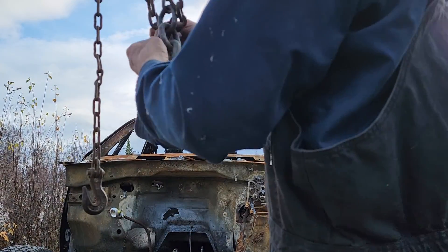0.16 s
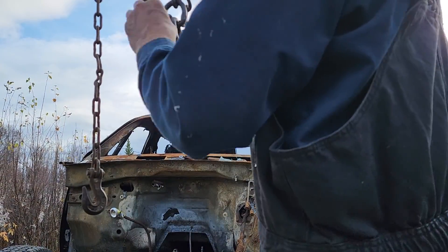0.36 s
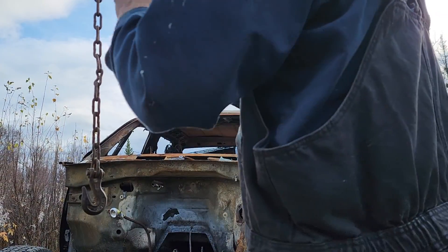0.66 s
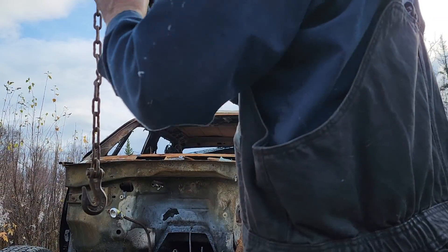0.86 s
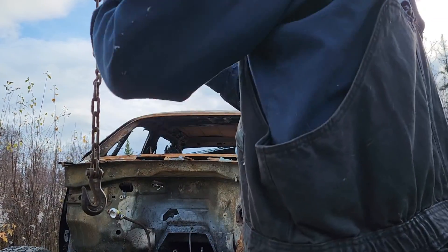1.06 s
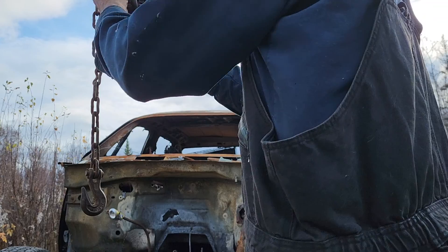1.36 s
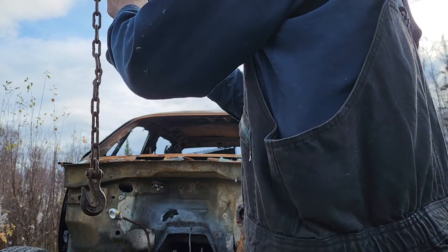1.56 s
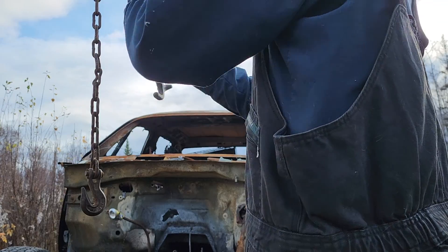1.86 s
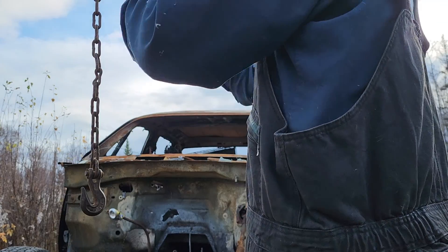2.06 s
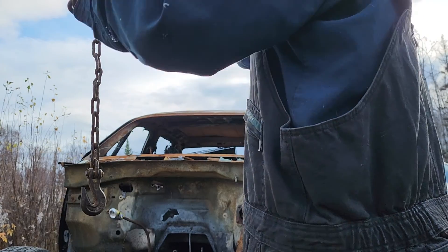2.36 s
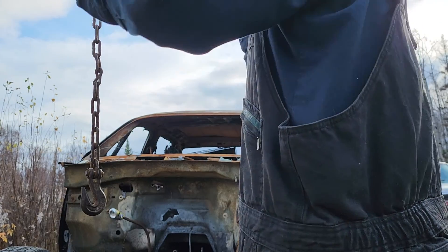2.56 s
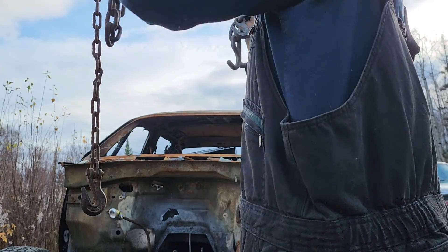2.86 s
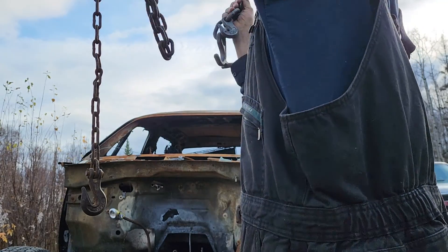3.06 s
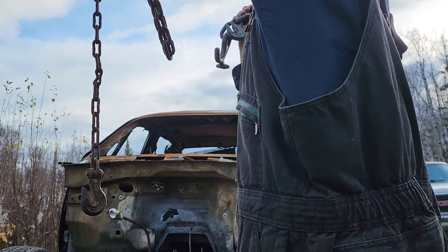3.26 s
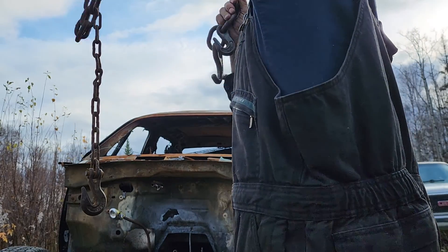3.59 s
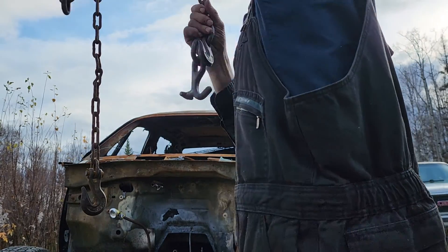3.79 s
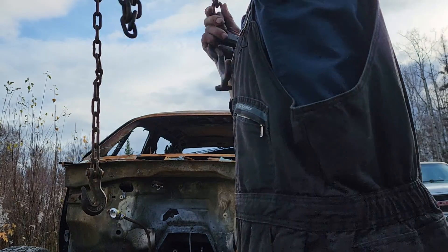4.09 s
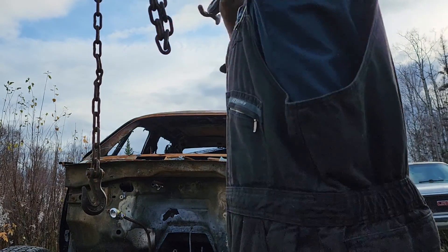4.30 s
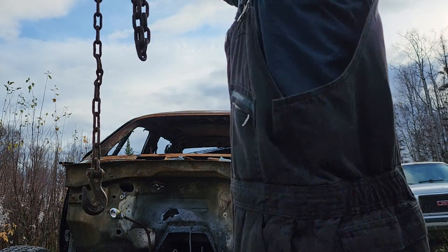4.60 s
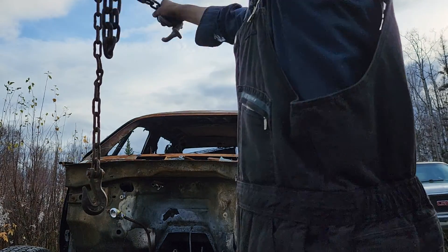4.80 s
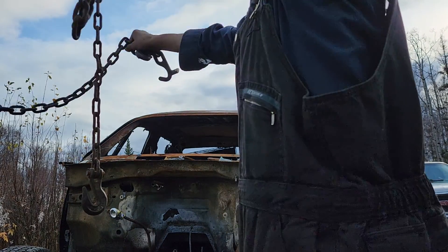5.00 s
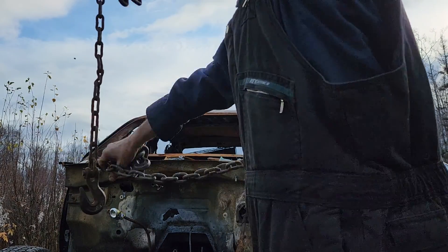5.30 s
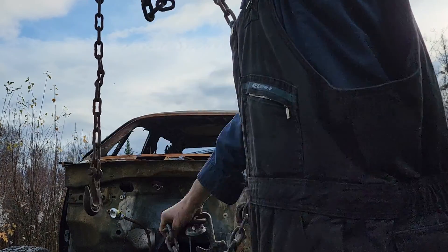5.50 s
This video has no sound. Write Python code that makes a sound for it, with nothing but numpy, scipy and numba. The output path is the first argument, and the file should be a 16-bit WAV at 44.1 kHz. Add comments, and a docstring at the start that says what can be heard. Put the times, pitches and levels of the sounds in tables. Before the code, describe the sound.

Steel chain and hook clink and ring brightly close by while a rough truck engine idles steadily a few metres behind, outdoors.

```python
"""A V8 truck idles a few metres from a phone with two microphone ports. Uneven exhaust puffs ring the pipes of
its two banks; valve blows rattle covers and block. Close to the phone, hands shift a steel chain and hook: each
clink rings decaying link and hook modes. Slack chain knocks on a car shell, ringing dull sheet-metal modes and
a scrape of noise. Behind them lies banded noise of fan rush and open air; the phone's gain control turns the
scene down twice."""
import sys
import numpy as np
from scipy import signal
from scipy.io import wavfile
from scipy.ndimage import uniform_filter1d
from numba import njit

SR = 44100
rng = np.random.default_rng(int(sys.argv[2]) if len(sys.argv) > 2 else 0)


def store_pcm(level_fs):
    """Save levels as 16-bit WAV."""
    pcm = np.round(np.clip(level_fs, -1, 1) * 32767).astype(np.int16)
    wavfile.write(sys.argv[1], SR, np.atleast_2d(pcm).T)


N = 249008


def undb(db):
    """Decibels to an amplitude factor."""
    return 10 ** (np.asarray(db) / 20)


def level(x, db):
    """Scale x to an rms level."""
    return x * undb(db) / np.sqrt(np.mean(x ** 2))


def band(x, hz, width):
    """Two-pole resonance, gain 1 at the centre."""
    return signal.lfilter(*signal.iirpeak(hz, hz / max(width, 1), fs=SR), x)


def band_twice(x, hz, width, second_width):
    """Two resonances in a row at one centre, for steeper skirts."""
    return band(band(x, hz, width), hz, second_width)


def butter(x, order, hz, kind="low"):
    """Butterworth filter."""
    return signal.sosfilt(signal.butter(order, hz, kind, fs=SR, output="sos"), x)


def pair(likeness):
    """Left and right noise that share a part."""
    mid, side = rng.standard_normal((2, N))
    c = np.clip(likeness, 0, 1)
    return np.sqrt((1 + c) / 2) * mid + np.sqrt((1 - c) / 2) * side * np.array([[1], [-1]])


def spikes(s, size):
    """An impulse at each time that falls within the scene."""
    at = (np.asarray(s) * SR).astype(int)
    keep = (at >= 0) & (at < N)
    return np.bincount(at[keep], size[keep], N)


def fade(x, t60):
    """Each impulse becomes an exponential tail."""
    return signal.lfilter([1], [1, -np.exp(-np.log(1000) / (t60 * SR))], x)


# Idle speed: t/s, engine cycles f/Hz; one cycle is two crank turns, eight firings
IDLE_SPEED = [(0.0, 5.8499), (1.1, 5.874), (2.2, 5.8646), (3.3, 5.862), (4.4, 5.8513), (5.65, 5.8838)]
FIRST_FIRING = .188  # cycles


def times(count):
    """Moments at which the engine passes each of count equal steps of its cycle."""
    s, cycle_hz = np.transpose(IDLE_SPEED)
    clock = np.arange(N) / SR
    turns = np.cumsum(np.interp(clock, s, cycle_hz)) / SR - FIRST_FIRING
    step = np.arange(-count, int(turns[-1] * count) + 1)
    return np.interp(step / count, turns, clock, left=-1), step % count


# Cylinders in firing order: exhaust bank, lateness t/ms, level/dB
FIRING_ORDER = [(0, -0.15, 4), (1, -0.36, 4.5), (1, 0.27, -1.9), (0, -0.36, 7), (1, -0.45, 4),
                (0, -0.96, 0.5), (0, -1.45, 2), (1, -0.52, 1.5)]
# Standing waves, one list for each bank's pipe: f/Hz, width f/Hz, level/dB, polarity
PIPE_MODES = [
    [(66, 35.3, 23, 1), (77.9, 5.1, 33.5, -1), (101.67, 8.85, 39.5, -1), (105.1, 7.56, 41.5, 1),
     (120, 13.6, 25, -1), (157.7, 8.5, 29.5, -1), (232.7, 17.5, 30, -1), (231.57, 14.8, 33.5, 1)],
    [(45.2, 7, 27.5, -1), (64.55, 27.4, 37, 1), (65.38, 10.9, 39.5, -1), (134.4, 26.1, 31.5, -1),
     (177, 12.7, 37, -1), (177.14, 7.74, 40, 1), (231.3, 6, 23.5, -1), (260.3, 27, 19, 1)],
]


def exhaust():
    """The banks fire unevenly (cross-plane crank), each into its own pipe."""
    s, cylinder = times(count=8)
    bank, late_ms, db = np.transpose(FIRING_ORDER)[:, cylinder]
    late_chance, size_chance = rng.standard_normal((2, len(s)))
    s = s + (late_ms + 0.19 * late_chance) / 1000
    size = undb(db + 1.38 * size_chance)  # combustion varies
    out = 0
    for k, pipe in enumerate(PIPE_MODES):
        puffs = spikes(s, size * (np.round(bank) == k))
        for hz, width, mode_db, polarity in pipe:
            out = out + np.sign(polarity) * undb(mode_db) * band(puffs, hz, width)
    out = butter(butter(out, 2, 400), 1, 20, "high")
    # low tones reach both ports alike; a band near 208 Hz differs between them
    lean = level(band(out, 208, 140), -17.0) * np.array([[-1], [1]])
    return level(out, 0) + lean


# Sixteen valve events a cycle: level/dB in the pan and covers, level/dB in the block
VALVE_BLOWS = [(-7.5, -10), (-2.5, 4.5), (-4.5, -7), (-16, -12), (0.5, -37.5), (-8.5, 2), (-10, 11.5),
               (-11, -15), (-11.5, -4), (0.5, -3.5), (-5, 8.5), (-12, 3.5), (-11.5, 2), (-3, 3.5),
               (-6.5, -6), (-12.5, -32)]
# Resonances of the pan and covers: f/Hz, width f/Hz, level/dB
COVER_MODES = [(476, 60, -2.5), (536, 42, 5.5), (752, 540, -5), (838, 180, -2), (1078, 150, 0.5)]
# Resonances of the engine block: f/Hz, width f/Hz, level/dB
BLOCK_MODES = [(1251, 76, -1.5), (1775.5, 68, 3.5), (2000, 150, -2), (2396, 73, -3.5), (2620, 120, -44),
               (3660, 150, -12.5)]
PORT_LAG_S = 0.000094  # the right port hears the valve gear later


def clatter():
    """Each valve blow is a tick and a puff of hiss; both ring the covers and the block."""
    s, valve = times(count=16)
    blow_db = np.array(VALVE_BLOWS)[valve]
    out = 0
    for k, (modes, db, likeness, tick_db) in enumerate([(COVER_MODES, -16, .4, 19), (BLOCK_MODES, -14, .5, 14)]):
        blows = spikes(s, undb(blow_db[:, k] + 1.7 * rng.standard_normal(len(s))))
        hiss = (fade(blows, 0.064) + 0.14) * pair(likeness)  # a little hiss never stops
        drive = hiss + undb(tick_db) * blows
        ringing = sum(undb(mode_db) * band_twice(drive, hz, width, 2 * width) for hz, width, mode_db in modes)
        out = out + level(ringing, db)
    out[1] = np.interp(np.arange(N) - PORT_LAG_S * SR, np.arange(N), out[1])
    # the bonnet holds the treble back; the left port hears a little more
    return butter(out, 2, 3200) * undb(np.array([[.8], [-.8]]))


@njit
def add(out, start, pole, rise, left, right):
    """Adds sines that swell and decay, each with its own size and phase at the two microphone ports."""
    for k in range(len(start)):
        z, rest, i = 1. + 0j, 1., start[k]
        while i < out.shape[1] and z.real ** 2 + z.imag ** 2 > 1e-6:
            out[0, i] += (1 - rest) * (z * left[k]).imag
            out[1, i] += (1 - rest) * (z * right[k]).imag
            z, rest, i = z * pole[k], rest * rise, i + 1


def strike(s, db, pan_db, ring, rise_ms, modes, detune, scatter_db, spread, ping_hz=None):
    """Every blow rings one table of modes; where it lands changes the share of each."""
    hz, mode_db, t60 = np.transpose(modes)
    share_chance, pitch_chance, phase_chance = rng.standard_normal((3, len(s), len(hz)))
    share_db = mode_db + scatter_db * share_chance
    hz = hz * (1 + detune * pitch_chance)
    if ping_hz is not None:  # the mode next to the ping gets a fixed, large share
        nearest = np.arange(len(s)), np.argmin(abs(hz - ping_hz[:, None]), axis=1)
        share_db[nearest] = 13.5
    size = undb(share_db)
    size = size / np.sqrt(np.sum(size ** 2, axis=1, keepdims=True)) * undb(db)[:, None]
    # a grip adds its damping to each mode's own
    decay = np.log(1000) * (1 / t60 + 1 / np.clip(ring, .01, 5)[:, None])
    pole = np.exp((2j * np.pi * hz - decay) / SR)
    rise = np.exp(-1000 / (rise_ms * SR))
    tilt = undb(pan_db / 2)[:, None] * np.exp(1j * spread * phase_chance)
    out = np.zeros((2, N))
    start = np.repeat((s * SR).astype(np.int64), len(modes))
    add(out, start, pole.ravel(), rise, (size * tilt).ravel(), (size / tilt).ravel())
    return out


REBOUND_FADE_DB, REBOUND_SCATTER_DB = 6, 2.5  # loss per mean delay; scale of the random gain


def rebounds(s, mean_s, count):
    """After each blow, count small collisions follow at random: times, gains in dB, index of the blow."""
    delay, luck = rng.exponential(size=(2, len(s), count))
    gain_db = REBOUND_SCATTER_DB * luck - REBOUND_FADE_DB * delay
    at = s[:, None] + .004 + mean_s * delay
    return at.ravel(), gain_db.ravel(), np.repeat(np.arange(len(s)), count)


# Clinks close to the phone: t/s, link stretching peak level/dB, link bending rms level/dB,
# hook rms level/dB, the hook's loudest ping f/Hz
CLINK_BLOWS = [(0.0214, -52, -43.5, -48, 3060), (0.0941, -26, -25, -36.5, 3150),
               (0.1214, -41, -45, -38, 3660), (0.1965, -31, -45, -48, 3150), (0.2318, -38, -42, -45, 4410),
               (0.343, -20, -45, -41, 3660), (0.368, -28, -45, -48, 3010),
               (0.4348, -40, -39.5, -26.5, 5140), (0.4554, -36, -59, -55, 3390),
               (0.4894, -44, -60, -50, 3670), (0.5681, -56, -47, -52, 3020),
               (0.7082, -33, -29.5, -49, 3060), (0.7341, -43, -30.5, -47, 5780),
               (0.799, -27, -30.5, -40, 3840), (0.8693, -17, -30, -32, 5200),
               (0.9012, -8, -18.5, -36, 6660), (0.9264, -14, -26, -27.5, 6210),
               (0.9691, -8.5, -31, -35, 4380), (1.018, -8.5, -24, -28.5, 5430),
               (1.1392, -19, -46, -41, 3410), (1.1526, -17, -34.5, -35.5, 5150),
               (1.2974, -15.5, -36.5, -38, 3310), (1.3383, -30, -56, -42, 3000),
               (1.3866, -24, -25, -33.5, 5990), (1.4939, -42, -41, -39, 3070),
               (1.5573, -29, -42, -40, 4260), (1.6371, -20, -22.5, -34, 3000),
               (1.6544, -29, -30, -29.5, 4970), (1.7533, -19, -21, -19.5, 5110),
               (1.7738, -4.5, -12.5, -25, 5120), (1.8394, -42, -33, -35.5, 4340),
               (1.91, -46, -35, -43, 6600), (1.9344, -58, -38, -27.5, 5110), (1.9764, -34, -43, -41, 5150),
               (2.0142, -11, -25, -26, 5950), (2.0676, -20, -17.5, -21, 5450),
               (2.0851, -17, -20.5, -18.5, 6640), (2.116, -8, -30, -31, 4340),
               (2.1489, -20, -27, -16.5, 4970), (2.1709, -6, -25, -22.5, 4970),
               (2.1874, -12, -17, -21.5, 6620), (2.2019, -6.5, -24, -22, 6640),
               (2.2364, -4, -21, -22.5, 6610), (2.35, -13, -53, -43, 6620), (2.5078, -34, -56, -40, 6600),
               (2.5256, -16.5, -27.5, -27.5, 4860), (2.6363, -42, -39, -39.5, 3190),
               (2.6812, -58, -38.5, -41.5, 5000), (2.7934, -42, -56, -65, 3470),
               (2.9715, -25.5, -66, -52, 4590), (3.3751, -32, -51, -50, 3240),
               (3.5128, -23.5, -54, -45, 3540), (3.6182, -41, -56, -60, 3020),
               (3.706, -45, -52, -39.5, 6640), (3.7897, -51, -39, -35, 6660), (3.853, -56, -47, -37, 4310),
               (3.869, -59, -55, -30, 4310), (3.9055, -52, -36, -31.5, 4310), (3.935, -50, -42, -42, 6620),
               (3.9967, -52, -39, -38, 3180), (4.0102, -51, -34, -31, 5000), (4.0471, -46, -41, -41, 3180),
               (4.071, -15, -51, -38, 3170), (4.1244, -42, -33.5, -33.5, 5010),
               (4.1524, -45, -31, -48, 3580), (4.331, -25, -51, -49, 3180), (4.3509, -12, -40, -37, 4690),
               (4.3774, -10, -44, -39, 5720), (4.3979, -14, -44, -43, 3510),
               (4.4113, -10.5, -39, -34, 4150), (4.4746, -21.5, -52, -49, 3590),
               (4.4944, -24, -47, -55, 3000), (4.5295, -22, -39.5, -40, 3130),
               (4.6472, -45, -41, -38, 3160), (4.6712, -20, -34, -33, 4150),
               (4.6921, -10.5, -23, -22.5, 4450), (4.7074, -22, -21.5, -25, 4100),
               (4.767, -37, -41, -25, 4100), (4.8089, -39, -35, -18.5, 4110), (4.8473, -33, -49, -34, 4110),
               (4.9276, -15, -33, -28, 4160), (4.9399, -13, -43, -37, 4150), (4.972, -28, -35, -33, 4010),
               (5.0349, -14.5, -25, -21, 4620), (5.0882, -8.5, -31, -28, 4040),
               (5.1396, -16, -40, -43, 3220), (5.1586, -8.5, -35, -43, 3330),
               (5.2479, -23, -42.5, -36, 3500), (5.3052, -22, -46, -36, 3090),
               (5.3257, -3.5, -29.5, -30, 5100), (5.3681, -19.5, -44, -45, 5000),
               (5.4074, -36, -50, -38.5, 4980), (5.6325, -20, -52, -47, 3430)]
# Ring modes, each table: f/Hz, level/dB, t60 t/s
# lower modes of the hook
HOOK_LOW_MODES = [(3149, -8, .2), (3620, -12, .06), (4120, -6, .25), (4325, 0, .25), (4640, -10, .07),
                  (4976, -2, .2), (5130, -4, .1), (5430, -5, .07), (5900, -4, .08), (6600, -8, 1.0),
                  (6611, -10, .9)]
# links bending
BEND_MODES = [(7800, -32, .12), (8120, 4, 0.48), (8040, 3.5, 0.056), (8500, 11, 0.092), (8800, 9.5, 0.3),
              (8800, 7, 0.036)]
# upper modes of the hook
HOOK_HIGH_MODES = [(10617, 0, .35), (10812, -16, .6), (11780, -7, .2), (12149, -7, .6)]
# links stretching
STRETCH_MODES = [(14062, -11, .25), (14310, -9, .2), (14420, 0, .08), (14504, 1, .45), (14671, -7, .07),
                 (14846, -9, .08), (14900, -3, .07), (14950, -2, .3), (15200, -10, .05), (15400, -11, .05),
                 (15714, -9, .25)]
# How freely the hook hangs: t/s, ring t60 t/s of the grip's damping, before weak parts are shortened
HOOK_GRIP = [(0, 0.071), (.85, 0.16), (1.6, .12), (1.66, 0.57), (2.05, 0.18), (2.17, 2.7), (2.7, 0.99),
             (3.6, 0.17), (4.2, .2), (4.3, 0.073), (4.65, 0.1), (5.35, 0.12), (5.41, .4)]
HOOK_HIGH_DB = (-15.5, -3.5)  # upper hook modes against the lower ones: held in the hand, hanging free
LINK_PAN_DB, HOOK_PAN_DB, PAN_SCATTER_DB = 4.5, 1.5, 2  # left minus right: the links hang further left
STRETCH_GRIP_S, BEND_GRIP_S = 0.2, 0.073  # t60 of the grip's damping, before weak parts are shortened
REBOUND_DB, REBOUND_S = -13.5, .035  # loose links settling: level against the clink, mean delay
TICK_DB, TICK_T60_S = -13.5, 0.012  # click of contact before its filter, against the loudest part


def chain():
    """Each clink: a short crack with link and hook modes, then loose links settling; a grip shortens the ring."""
    s, stretch_db, bend_db, hook_db, ping_hz = np.transpose(CLINK_BLOWS)
    at, gain_db, parent = rebounds(s, REBOUND_S, count=6)
    lean_db = PAN_SCATTER_DB * rng.standard_normal(len(s))
    crest_db = 10 * np.log10(2)  # rms to peak of a sine
    loudest_db = np.max([stretch_db, bend_db, hook_db], axis=0)
    hanging = np.interp(s, *np.transpose(HOOK_GRIP))
    high_db = hook_db + np.interp(np.log10(hanging), [-1, 0], HOOK_HIGH_DB)
    each, scatter_db = np.ones(len(s)), 4
    # modes, dB, pan dB, grip t60 s, detune (links differ a little in size), ping Hz, crack dB, crack width
    parts = [
        (HOOK_LOW_MODES, hook_db + crest_db, HOOK_PAN_DB, hanging, .001, ping_hz, 1.5, 0.28),
        (BEND_MODES, bend_db + crest_db, LINK_PAN_DB, BEND_GRIP_S * each, .015, None, 3.5, 0.12),
        (HOOK_HIGH_MODES, high_db + crest_db, HOOK_PAN_DB, hanging, .0005, None, -10, 0.42),
        (STRETCH_MODES, stretch_db, LINK_PAN_DB, STRETCH_GRIP_S * each, .002, None, -3, 0.11)]
    out = 0
    for modes, db, pan_db, ring, detune, ping, crack_db, width in parts:
        # a part that hardly sounds is held in the hand and dies fast
        free = np.clip((db - loudest_db + 31.5) / 22, .2, 1.1)
        blow_pan_db = pan_db + lean_db
        out = out + strike(s, db, blow_pan_db, ring * free, 0.85, modes, detune, scatter_db, 1.29, ping)
        loose_db = db[parent] + REBOUND_DB + gain_db
        loose_pan_db = np.full(len(at), pan_db)
        out = out + strike(at, loose_db, loose_pan_db, 0.61 * ring[parent], 0.62, modes, detune,
                           1.46 * scatter_db, 1.47)
        hz = np.mean(np.transpose(modes)[0])
        # faces grinding: a narrow hiss among the modes
        grind = fade(spikes(at, undb(loose_db - 11)), .04) * pair(.1)
        out = out + band_twice(grind, hz, .09 * hz, .09 * hz)
        burst = np.array([fade(spikes(s, undb(db + side * blow_pan_db / 2)), 0.086) for side in (1, -1)])
        burst = uniform_filter1d(burst, size=132, origin=65)  # the contact rolls on over 3 ms
        out = out + undb(crack_db) * band_twice(burst * pair(0.033), hz, width * hz, 2 * width * hz)
    tick = fade(spikes(s, undb(loudest_db + TICK_DB)), TICK_T60_S) * pair(0.27)
    return out + band_twice(tick, 8000, 9000, 9000)


# Chain falling on sheet metal: t/s, peak level/dB before the 6 dB trim of the modes,
# left minus right level/dB, loudest mode f/Hz
SHELL_FALLS = [(2.533, -17, 6, 2220), (4.674, -20, 12, 3290), (4.693, -13.5, 6, 938),
               (4.709, -19, 2.0, 1248), (4.768, -13, 14, 1698), (4.811, -23, -14, 1470),
               (4.848, -19, 4, 1470), (4.93, -21, -1, 3290), (5.035, -14.5, 5, 3290),
               (5.051, -14.5, 4, 938), (5.087, -19, -14, 722), (5.109, -27, -41, 722)]
# Sheet-metal modes of the car shell: f/Hz, level/dB, t60 t/s
SHELL_MODES = [(323.6, 1.5, 0.24), (722, -9, 0.057), (938, -19, 0.046), (1248, 3.5, 0.2), (1470, 1.5, 0.17),
               (1698, -2, .1), (2220, 0, 0.11), (2700, -54.5, 0.072), (3290, 7.5, 0.035)]
DRAG_DB, DRAG_S = -14.5, .08  # links dragging: level against the knock, mean delay


def knocks():
    """Dull sheet-metal modes and a scrape of noise under each fall; dragging links keep the shell sounding."""
    s, db, pan_db, ping_hz = np.transpose(SHELL_FALLS)
    at, gain_db, parent = rebounds(s, DRAG_S, count=12)
    s = np.append(s, at)
    db = np.append(db, db[parent] + DRAG_DB + gain_db)
    pan_db = np.append(pan_db, 0 * at)
    ping_hz = np.append(ping_hz, ping_hz[parent])
    scrape = fade(spikes(s, undb(db)), 0.049) * pair(0.1)
    scrape = band(band(scrape, 1450, 5500), 1280, 4600)
    ringing = strike(s, db - 6.0, pan_db, np.ones(len(s)), 1.0, SHELL_MODES, 0.0283, 6.8, 0.75, ping_hz)
    return ringing + undb(-0.5) * scrape


def walk(rate):
    """Random levels held 1 / rate s and slewed twice; spread near 1."""
    k = int(SR / rate)
    held = np.repeat(rng.standard_normal(N // k + 1), k)
    return 1.8 * uniform_filter1d(uniform_filter1d(held, k), k)[:N]


# Spectrum of fan rush and open air, before the whole is levelled: f/Hz, level/dB per Hz
AIR_SPECTRUM = [(18, -36), (30, -4), (96, -9.5), (155, -16), (317, -14), (598, -18.5), (1220, -19),
                (1470, -44), (1770, -17.5), (5100, -49), (9890, -57), (14700, -51), (16800, -94)]


def air():
    """Half-octave bands of fan rush and open air, wavering in level; the bass is nearly the same left and right."""
    out = 0
    hz_points, db_points = np.transpose(AIR_SPECTRUM)
    for hz in 40 * 2 ** np.arange(.5, 8.8, .5):
        db = np.interp(np.log(hz), np.log(hz_points), db_points) + 1.6 * walk(4.9)
        out = out + undb(db) * band_twice(pair(1 - hz / 700), hz, hz / 2, hz / 2)
    return level(out, -9.5) * undb(np.array([[1.5], [-1.5]]))  # dB against the exhaust; leans left


# Level dips of truck and open air: t/s, brief dip level/dB, its recovery t/s, lasting drop level/dB
LEVEL_DIPS = [(2.2, -3, 0.093, -3.5), (5.332, -11, 0.017, -4)]
TRUCK_DB, DIP_FALL_S, CREEP_BACK_DB_PER_S = -21, 0.014, 0.54


def sag():
    """Gain of truck and air: each dip falls fast, a part recovers quickly and the rest creeps back slowly."""
    db = TRUCK_DB
    clock = np.arange(N) / SR
    for s, brief_db, recovery_s, lasting_db in LEVEL_DIPS:
        after = np.maximum(clock - s, 0)
        fall = np.clip((clock - s) / DIP_FALL_S + 1, 0, 1)  # complete at s
        lasting = np.minimum(lasting_db + CREEP_BACK_DB_PER_S * after, 0)
        db = db + fall * (brief_db * np.exp(-after / recovery_s) + lasting)
    return undb(db)


def scene():
    """The phone's gain control turns the whole scene down twice; the chain and knock tables give levels with
    these dips already in them, so only the truck and open air are scaled here."""
    return sag() * (exhaust() + clatter() + air()) + chain() + knocks()


def record(dry):
    """The phone clips peaks at full scale, rolls off above the link tones and cuts the top."""
    clipped = np.clip(dry, -1, 1)
    soft = signal.sosfilt(signal.cheby2(10, 22, 16150, fs=SR, output="sos"), clipped)
    return signal.sosfilt(signal.ellip(12, .2, 100, 16900, fs=SR, output="sos"), soft)


dry = scene()
out = record(dry)
store_pcm(out)
```